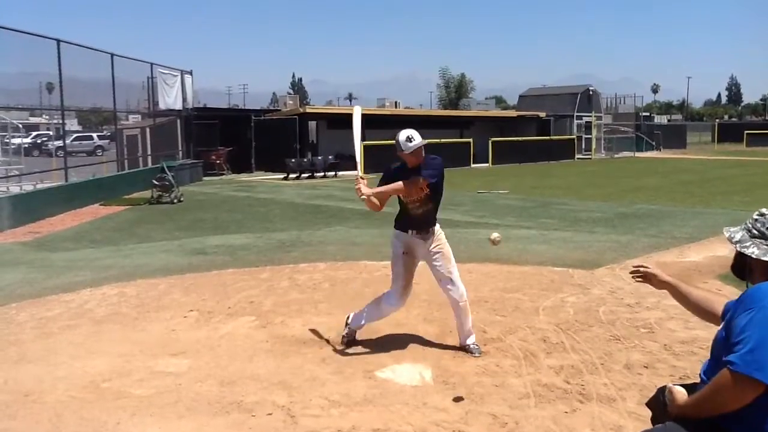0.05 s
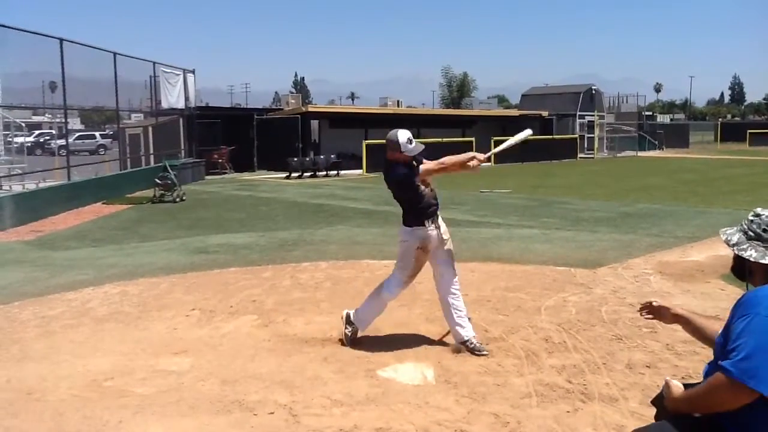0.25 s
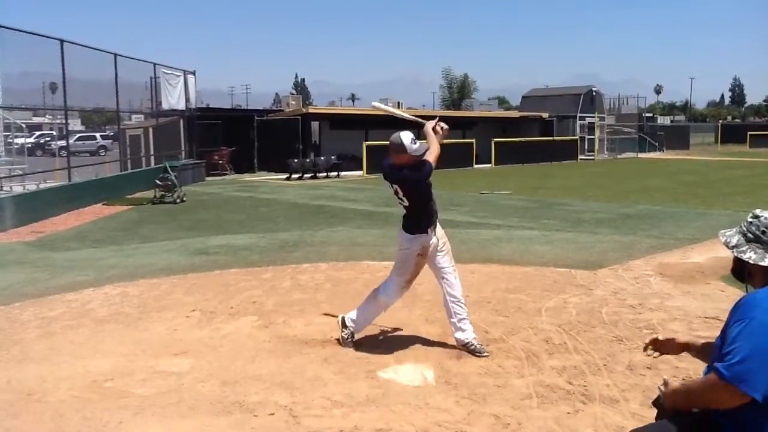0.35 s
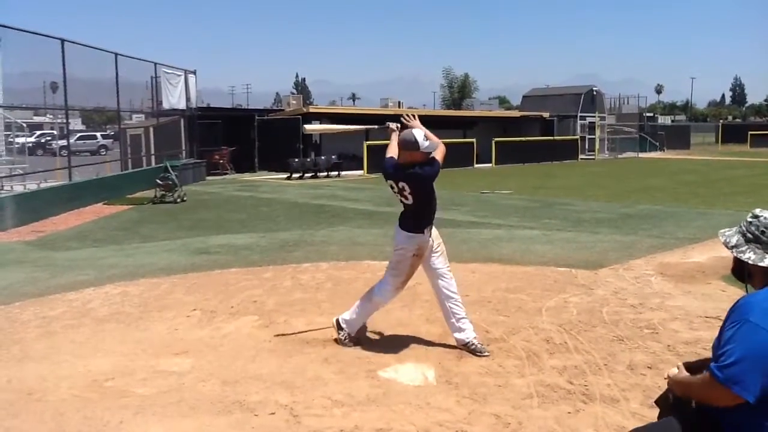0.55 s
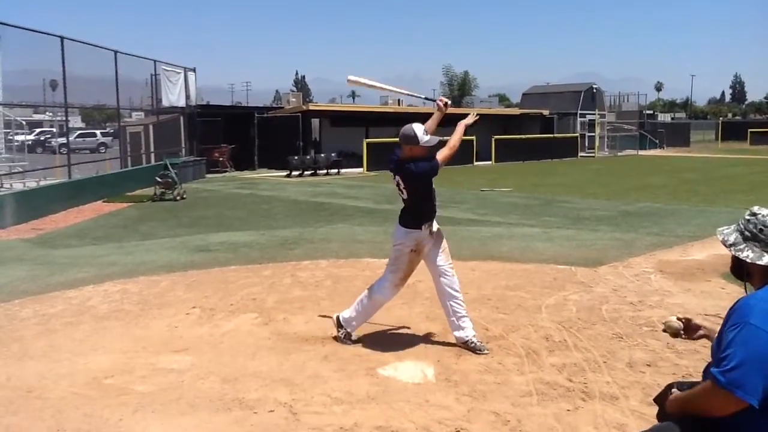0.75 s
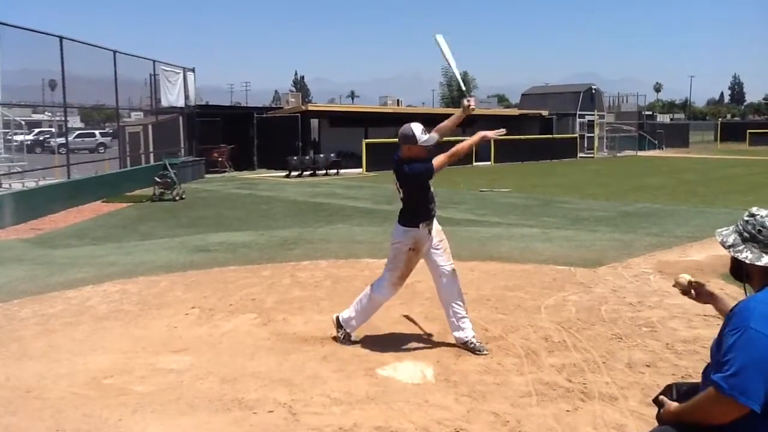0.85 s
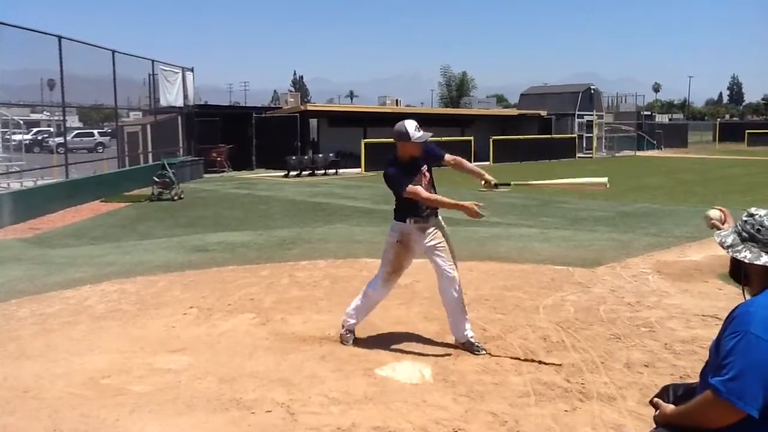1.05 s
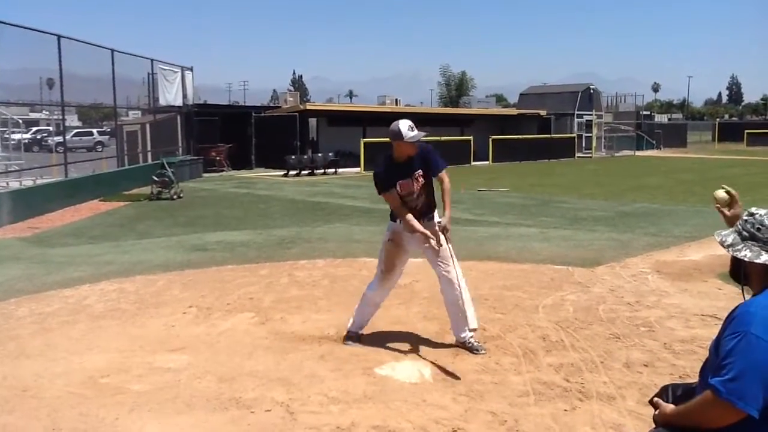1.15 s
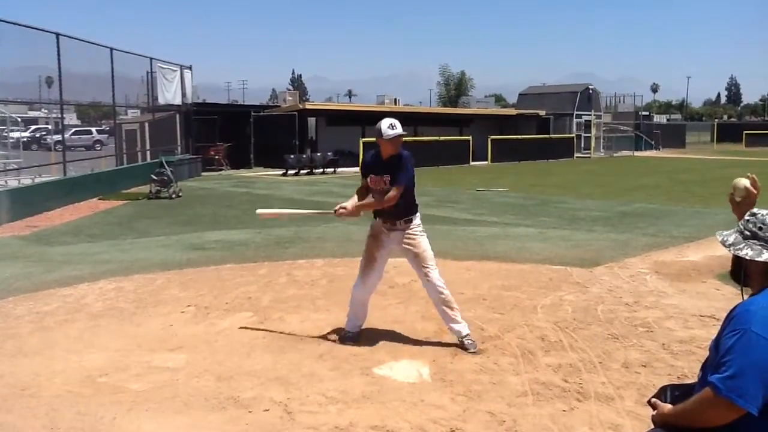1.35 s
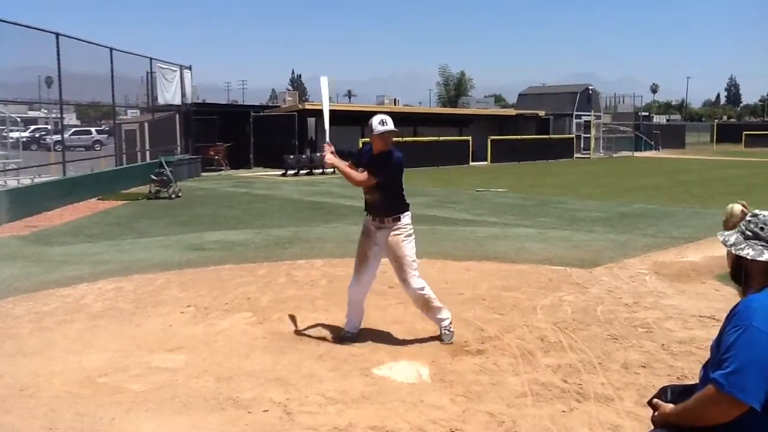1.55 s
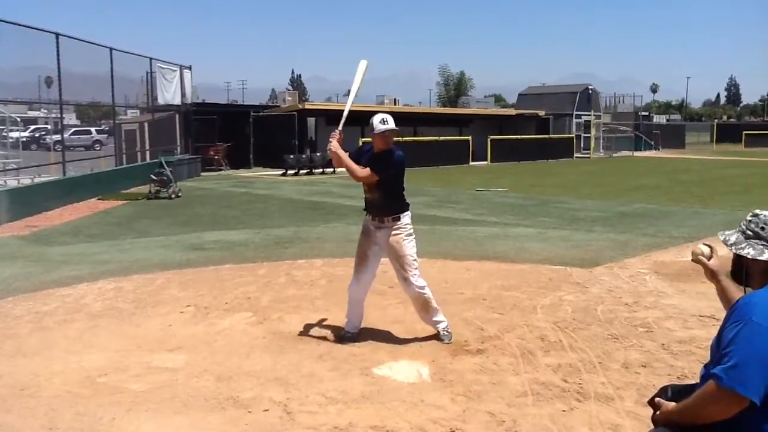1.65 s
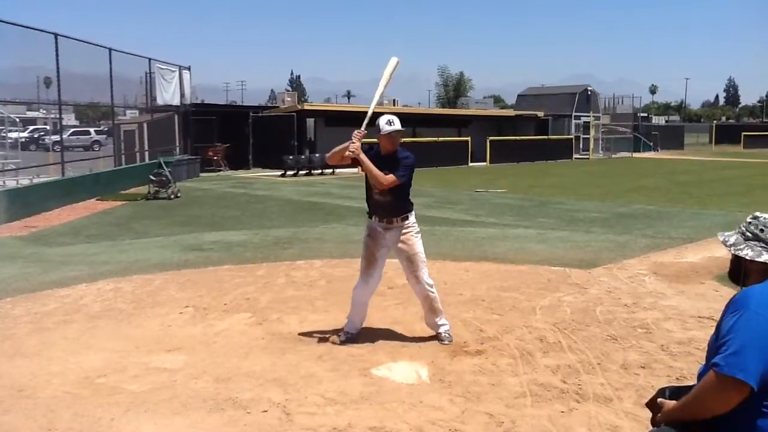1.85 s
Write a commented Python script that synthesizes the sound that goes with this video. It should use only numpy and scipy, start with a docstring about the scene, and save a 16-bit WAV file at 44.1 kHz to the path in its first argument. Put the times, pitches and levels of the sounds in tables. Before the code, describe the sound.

A wooden bat cracks sharply against a baseball once, with a faint echo outdoors.

```python
"""Bat striking a baseball

A wooden bat hits a tossed ball a few metres away on an open dirt field; the impact excites damped modes. The
crack reflects off far fences and buildings and returns 0.3 s later as a scattered, hissy echo. Shoes scuff and
tick on the dirt over a distant rumble. A gain control ducks at the crack and creeps back."""
import sys
import numpy as np
from scipy import signal
from scipy.fft import rfft, irfft
from scipy.io import wavfile
from scipy.ndimage import uniform_filter1d, minimum_filter1d

SR = 44100
rng = np.random.default_rng(int(sys.argv[2]) if len(sys.argv) > 2 else 0)


def wav_record(signal):
    """Record a signal, one row per channel, as 16-bit PCM in the file named by sys.argv[1]."""
    frames = np.transpose(np.atleast_2d(signal))
    bounded = np.clip(frames, -1, 1)
    # unit amplitude maps onto the largest positive 16-bit level
    quanta = np.round(bounded * 32767).astype(np.int16)
    wavfile.write(sys.argv[1], SR, quanta)


N = 83790
HIT_S, ECHO_S = .21137, .51

# Spectrum of distant traffic: frequency_hz, relative_db
TRAFFIC_SPECTRUM = [(30, -51), (60, -25), (90, -14.5), (120, -0.5), (145, 0.5), (180, -6), (230, -4),
                    (300, -17.5), (450, -14.5), (700, -20), (1000, -21.5), (2000, -29.5), (4000, -39),
                    (15000, -65)]
# Course of the traffic's level: time_s, level_db
TRAFFIC_LEVELS = [(0, -46.5), (.25, -44), (.5, -47), (.72, -43), (1.05, -45), (1.2, -44.5), (1.5, -46.5),
                  (1.9, -48.5)]
# Tones of a far machine, relative to the traffic: pitch_hz, relative_db
MACHINE_TONES = [(124, -12), (140, -13), (410, -22), (526, -14), (1459, -28)]
# Spectrum of the open-air hiss: frequency_hz, relative_db
HISS_SPECTRUM = [(300, -8), (1500, 2), (4000, -0.5), (8000, -7.5), (15000, -13)]
# Course of the hiss's level: time_s, level_db
HISS_LEVELS = [(0, -56), (.8, -57), (1.4, -58), (1.9, -62)]
# Spectrum of grit under a shoe: frequency_hz, relative_db
GRIT_SPECTRUM = [(300, -27), (1000, 0), (3500, 0), (8000, -7), (15000, -23.5)]
# Small impacts of shoes and grit: start_s, level_db, pitch_hz, grit_relative_db
SHOE_TICKS = [(0.0298, -30, 1150, 0), (.077, -36, 1450, -3), (0.272, -29, 2900, -4), (0.306, -34, 3600, 3),
              (0.406, -21, 3450, -7), (0.4073, -26.5, 1530, -22), (0.418, -30, 3480, -5),
              (1.1102, -31, 1120, -15), (1.1104, -31, 2100, -13), (1.175, -36, 850, -7),
              (1.248, -42, 1120, -8), (1.39, -38, 1710, -13), (1.404, -32, 530, -26)]
# Shoes twisting on the dirt: centre_s, half_width_s, level_db
SHOE_SCUFFS = [(0.084, 0.034, -53.5), (0.129, 0.012, -55), (0.222, 0.037, -46.5), (0.284, .014, -48),
               (0.372, 0.097, -49.5), (1.265, 0.014, -61), (1.398, 0.023, -61), (1.58, 0.031, -62)]
# Spectrum of air rushing round the bat: frequency_hz, relative_db
SWING_SPECTRUM = [(50, -28), (150, -4), (350, -10.5), (600, -4.5), (1300, -10), (3000, -28.5), (15000, -38)]
# Spectrum of the far echo: frequency_hz, relative_db
ECHO_SPECTRUM = [(200, -32), (450, 2), (560, -7), (740, -5.5), (880, 7.5), (1080, -4), (1300, -3),
                 (1550, -6.5), (2050, -3), (2330, 0.5), (2900, -3.5), (3450, -1.5), (4000, -2), (4600, 0.5),
                 (6000, -2.5), (8000, -6), (12000, -14.5), (15000, -24)]
# Time the echo takes to fall 60 dB: frequency_hz, t60_s
ECHO_DECAY = [(500, 0.87), (1000, 1), (2500, 0.52), (6000, 0.44), (14000, 0.494)]
# Spectrum of reflections from the rough ground: frequency_hz, relative_db
SCATTER_SPECTRUM = [(150, -16), (330, -22), (500, 4), (900, 8), (1400, -3), (1650, -12), (2100, -12),
                    (2400, -1), (3400, 1), (6000, -2), (10000, -11), (15000, -28)]
# Spectrum of the field's faint tail: frequency_hz, relative_db
TAIL_SPECTRUM = [(300, -8), (900, -2), (2000, -5), (4000, 0), (8000, -3), (15000, -14)]
# Normal modes of bat and ball: pitch_hz, relative_db, t60_s
BAT_MODES = [(917, -13, 0.017), (1390, -14.5, .008), (1976, -20.5, 0.005), (2428, -35.5, 0.029),
             (3264, -18, 0.017), (3945, -19, 0.018), (4500, -31.5, 0.028), (5200, -29, 0.015),
             (5430, -36, 0.019), (6113, -40, .034)]


def from_db(db):
    """Amplitude ratio of a level in decibels."""
    return 10 ** (np.asarray(db) / 20)


def unit_rms(x):
    """Normalisation to unit power."""
    return x / np.sqrt(np.mean(x ** 2) + 1e-20)


def seconds():
    """Time of every sample."""
    return np.arange(N) / SR


def in_time(points):
    """Linear interpolation of a table at every sample."""
    return np.interp(seconds(), *np.transpose(points))


def at_hz(points, hz):
    """Interpolation of a table on a log-frequency axis."""
    frequencies, values = np.transpose(points)
    return np.interp(np.log(hz), np.log(frequencies), values)


def cut(x, hz, kind, order=2):
    """Butterworth low- or high-pass filtering."""
    return signal.sosfilt(signal.butter(order, hz, kind, fs=SR, output="sos"), x + 1e-18)


def delay(x, lag_s):
    """Pure delay, to the nearest sample."""
    return np.concatenate([np.zeros(round(lag_s * SR)), x])[:N]


def click(start_s):
    """A unit impulse."""
    return delay(signal.unit_impulse(N), start_s)


def ring(x, hz, t60_s):
    """Damped resonator: its impulse response is a decaying unit sine."""
    radius = np.exp(-np.log(1000) / (t60_s * SR))
    angle = 2 * np.pi * hz / SR
    return signal.lfilter([0, np.sin(angle)], [1, -2 * radius * np.cos(angle), radius ** 2], x + 1e-18)


def decay(start_s, t60_s):
    """Exponential decay from 1, falling 60 dB in t60_s."""
    age = seconds() - start_s
    return (age >= 0) * np.exp(-np.log(1000) * np.maximum(age, 0) / t60_s)


def swell(centre_s, half_width_s):
    """Gaussian envelope, down to 1/e at the half width."""
    return np.exp(-((seconds() - centre_s) / half_width_s) ** 2)


def drift(corner_hz):
    """Random fluctuation: low-passed noise of unit rms."""
    hop, settling = 100, 1000
    pole = np.exp(-2 * np.pi * corner_hz * hop / SR)
    white = rng.standard_normal(N // hop + settling + 2)
    slow = signal.lfilter([1], [1, -2 * pole, pole ** 2], white)[settling:]
    return np.interp(np.arange(N) / hop, np.arange(len(slow)), unit_rms(slow))


def noise(spectrum, envelope=None):
    """Spectrally shaped noise of unit rms; envelope(hz), if given, then scales each half-octave band."""
    hz = np.maximum(np.arange(N // 2 + 1) * SR / N, 1)
    bins = rfft(rng.standard_normal(N)) * from_db(at_hz(spectrum, hz))
    bins /= np.std(irfft(bins, N))
    if envelope is None:
        return irfft(bins, N)
    out = 0
    for centre_hz in 31.25 * 2 ** (np.arange(19) / 2):
        band = np.maximum(1 - 2 * np.abs(np.log2(hz / centre_hz)), 0)
        out += irfft(bins * band, N) * envelope(centre_hz)
    return out


def surroundings():
    """Random modulation: traffic wavers band by band and a machine's tones broaden, under airy hiss."""
    waver_db, linewidth_hz = 1.5, 3.0
    traffic = noise(TRAFFIC_SPECTRUM, lambda hz: from_db(waver_db * drift(corner_hz=4.7)))
    hiss = from_db(in_time(HISS_LEVELS)) * noise(HISS_SPECTRUM)
    hum = 0
    for pitch_hz, relative_db in MACHINE_TONES:
        phase = 2 * np.pi * pitch_hz * seconds()
        wavering = drift(linewidth_hz) * np.sin(phase) + drift(linewidth_hz) * np.cos(phase)
        hum += from_db(relative_db) * wavering
    return from_db(in_time(TRAFFIC_LEVELS)) * (traffic + hum) + hiss


def footwork():
    """Impact and friction: ticks ring a few cycles and shed grit; twisting shoes rub it in clumps."""
    grit = noise(GRIT_SPECTRUM)
    ticks = 0
    for start_s, level_db, pitch_hz, grit_relative_db in SHOE_TICKS:
        tone = ring(click(start_s), pitch_hz, t60_s=9 / pitch_hz)
        spray = from_db(grit_relative_db - 14) * grit * decay(start_s, t60_s=.024)
        ticks += from_db(level_db) * (tone + spray)
    clumps = from_db(2.5 * drift(corner_hz=150))
    scuffs = sum(from_db(db) * swell(centre_s, half_s) for centre_s, half_s, db in SHOE_SCUFFS)
    return cut(ticks, 610, "high") + grit * clumps * scuffs


def swing():
    """Flow noise: a soft rush of air round the bat, strongest near the moment of contact."""
    return from_db(-43.5) * noise(SWING_SPECTRUM) * swell(centre_s=.217, half_width_s=.05)


def far_echo():
    """Diffuse reflection: far fences and buildings smear the crack into noise whose treble dies first."""
    rise_s, hold_s, first_share = .024, .022, .37
    age = seconds() - ECHO_S
    rise = (age > 0) * np.minimum(first_share + (1 - first_share) * age / rise_s, 1)
    fading_s = np.maximum(age - rise_s - hold_s, 0)
    uneven_gain = from_db(-35.5 + drift(corner_hz=79))  # reflections vary by 1 dB rms
    reflections = noise(ECHO_SPECTRUM, lambda hz: from_db(-60 * fading_s / at_hz(ECHO_DECAY, hz)))
    wash = uneven_gain * rise * reflections
    # The bat's upper modes still colour the echo.
    overtones = sum(ring(wash, hz, t60_s=.014) for hz, _, _ in BAT_MODES if hz > 2200)
    return wash + from_db(-9) * np.std(wash) * unit_rms(overtones)


def near_reflections(direct):
    """Multipath: delayed copies off the dirt and a close object, rough-ground scatter and a faint tail."""
    ground = .95 * delay(cut(direct, 1542, "low", order=1), lag_s=.001583)
    close_object = from_db(-19.5) * delay(direct, lag_s=.00655)
    diffuse_start_s = HIT_S + .0019
    scatter = from_db(-28.5) * noise(SCATTER_SPECTRUM) * decay(diffuse_start_s, t60_s=.04)
    tail = from_db(-47) * noise(TAIL_SPECTRUM) * decay(diffuse_start_s, t60_s=.09)
    return ground + close_object + scatter + tail


def bat_crack():
    """Impulse excitation: contact snaps, the ball's mass thumps, and the modes of bat and ball ring."""
    blow = click(HIT_S)
    snap = from_db(9.5) * cut(cut(blow, 607, "high"), 7750, "low")
    thump = from_db(-36) * ring(blow, hz=130, t60_s=.012)
    modes = sum(from_db(db) * ring(blow, hz, t60_s) for hz, db, t60_s in BAT_MODES)
    ringing = delay(cut(modes, 304, "high"), lag_s=.00037)  # begins once the ball is squashed
    direct = snap + thump - ringing
    return from_db(12.5) * cut(direct + near_reflections(direct), 14300, "low", order=4)


def scene():
    """Superposition of all sources at one microphone."""
    return (bat_crack() + far_echo() + footwork() + swing() + surroundings())[None]


def record(dry):
    """Automatic gain control: gain drops at the peak and recovers slowly; a low-pass limits the band."""
    ceiling_db, recovery_db_per_s, lookahead_s = .71, 7.5, .0023
    excess_db = np.maximum(20 * np.log10(np.abs(dry[0]) + 1e-9) - ceiling_db, 0)
    recovery_db = recovery_db_per_s * seconds()
    reduction_db = np.maximum.accumulate(excess_db + recovery_db) - recovery_db
    ahead = int(lookahead_s * SR)
    gain_db = uniform_filter1d(minimum_filter1d(-reduction_db, 2 * ahead + 1), ahead)
    low_pass = signal.firwin(511, cutoff=15300, fs=SR)
    return signal.fftconvolve(dry * from_db(gain_db), low_pass[None], "same")


dry = scene()
out = record(dry)
wav_record(out)
```